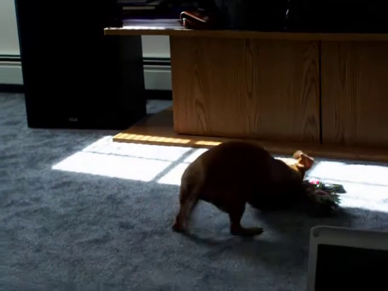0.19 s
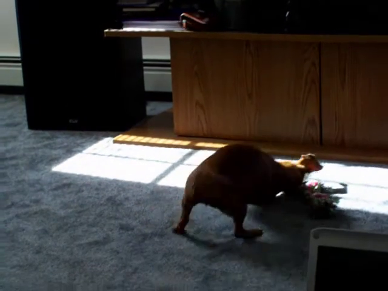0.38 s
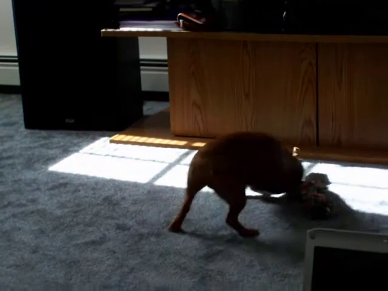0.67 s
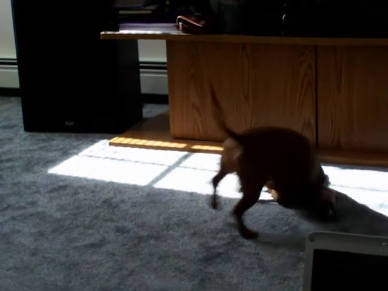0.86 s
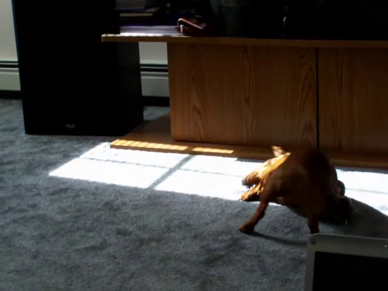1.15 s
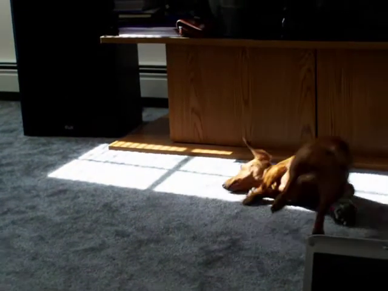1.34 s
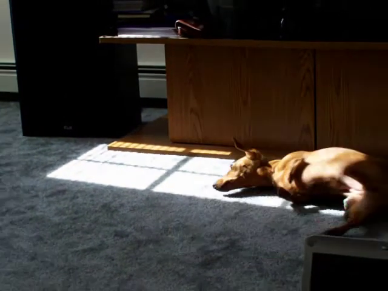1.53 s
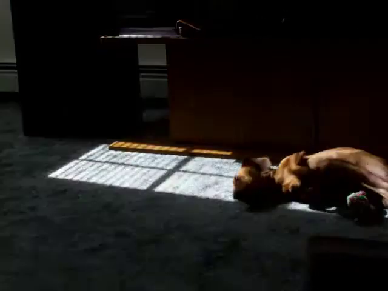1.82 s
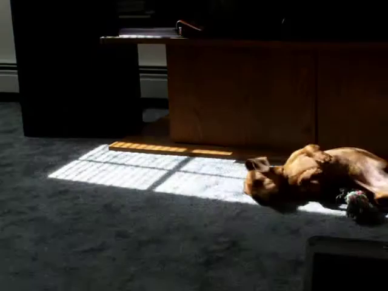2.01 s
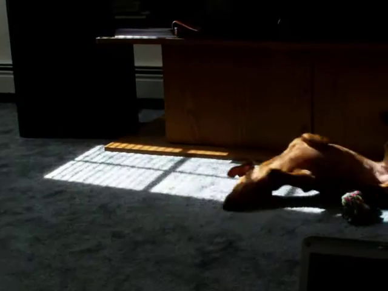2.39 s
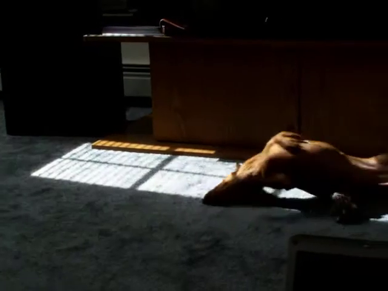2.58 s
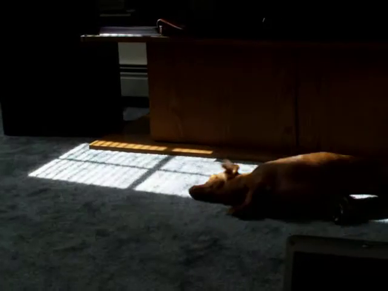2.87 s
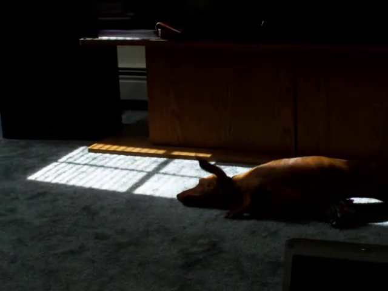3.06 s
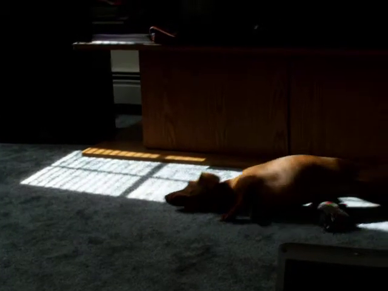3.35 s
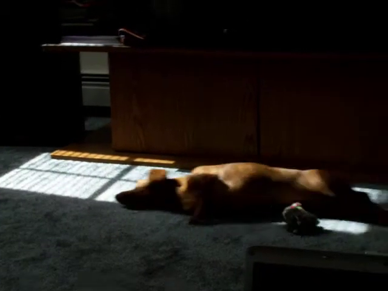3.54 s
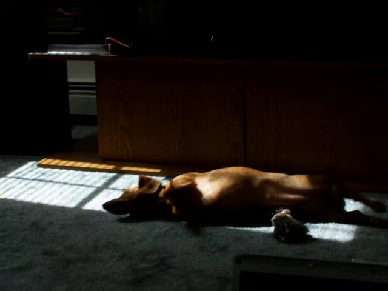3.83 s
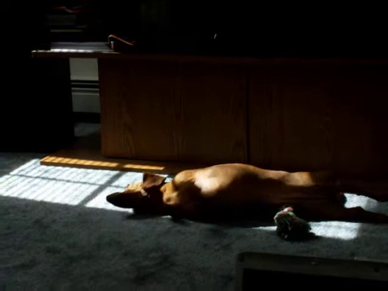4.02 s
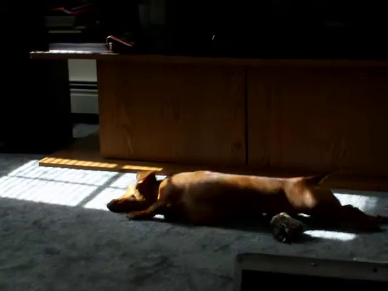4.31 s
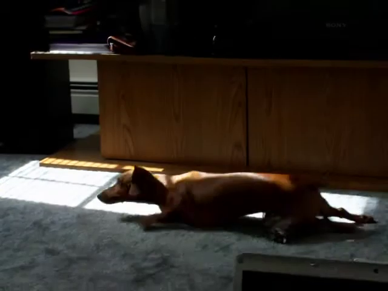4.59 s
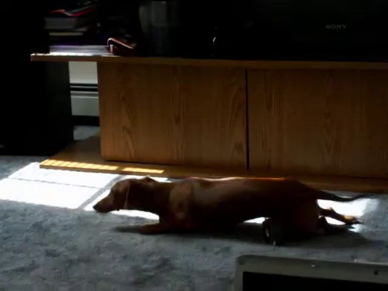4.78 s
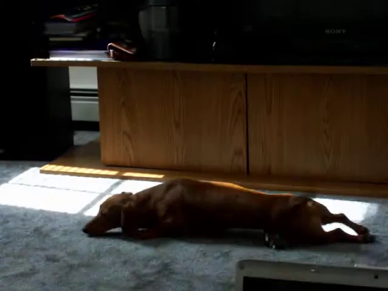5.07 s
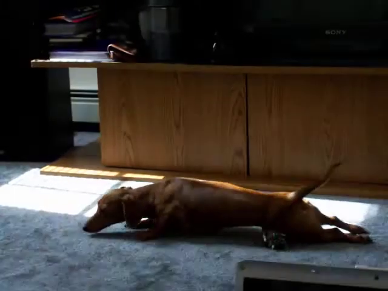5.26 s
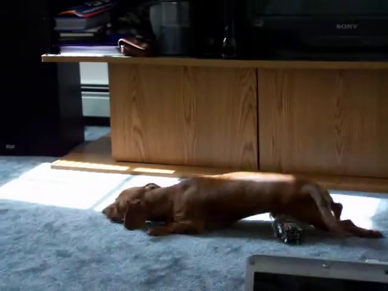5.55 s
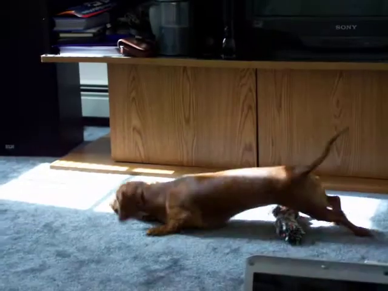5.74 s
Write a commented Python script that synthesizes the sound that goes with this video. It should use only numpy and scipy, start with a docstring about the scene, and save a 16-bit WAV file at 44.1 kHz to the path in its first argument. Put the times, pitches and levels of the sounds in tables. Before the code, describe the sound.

A dog rolls and shuffles on carpet with a rope toy, soft rustles and thumps, broken by sharp mechanical clacks close to the microphone.

```python
"""A small dog rolls and drags itself over a carpet in a quiet living room, heard by a pocket camera.
From the start fur and rope rustle as dense clicks, paws and body thump as decaying floor modes, and hiss
and mains hum lie below; a claw or tag soon ticks. Near 1.9 s a mechanism inside the camera clacks right at
the microphone: knocks and case modes, then a ringing spring. At 3.8 s the rope scrapes along the pile;
more ticks follow, and the mechanism clacks again near 5.1 s and 5.4 s."""
import sys
import numpy as np
from scipy import signal
from scipy.fft import rfft, irfft
from scipy.io import wavfile

SR = 44100
rng = np.random.default_rng(int(sys.argv[2]) if len(sys.argv) > 2 else 0)


def ratio(d):
    """dB to gain"""
    e = np.asarray(d, float) / 20
    return 10 ** e


def int16_out(signal):
    """Quantize to a 16-bit WAV file."""
    q = np.round(np.clip(np.atleast_2d(signal).T, -1, 1) * 32767)
    wavfile.write(sys.argv[1], SR, q.astype(np.int16))


N = 260190


def rms_one(x):
    """Normalisation: equal mean power, so that rms is 1."""
    return x / np.sqrt(np.mean(x ** 2) + 1e-20)


def drift(rate_hz):
    """Low-pass random fluctuation: noise through a double real pole, rms 1."""
    step = 40  # computed at every 40th sample, then interpolated
    r = np.exp(-2 * np.pi * rate_hz * step / SR)
    noise = rng.standard_normal(N // step + 2002)
    slow = signal.lfilter([1], [1, -2 * r, r * r], noise)[2000:]  # the filter has settled
    return np.interp(np.arange(N) / step, np.arange(len(slow)), rms_one(slow))


def colour(x, spectrum):
    """Spectral shaping: each frequency is weighted by a curve of (Hz, dB per Hz); rms 1."""
    hz, db = np.transpose(spectrum)
    log_hz = np.log(np.arange(N // 2 + 1) * SR / N + 1)
    gain = ratio(np.interp(log_hz, np.log(hz), db))
    return rms_one(irfft(rfft(x) * gain, N))


def band_noise(edges_hz):
    """Band-limited noise: a random source through a band-pass, rms 1."""
    band = signal.butter(2, edges_hz, "band", fs=SR, output="sos")
    return rms_one(signal.sosfilt(band, rng.standard_normal(N)))


def ring(clicks, hz, t60):
    """Impulse response of a damped resonator: a unit click starts a sine of height 1."""
    r, w = ratio(-60 / (max(t60, .001) * SR)), 2 * np.pi * hz / SR
    return signal.lfilter([0, np.sin(w)], [1, -2 * r * np.cos(w), r * r], clicks + 1e-18)


def add(out, s, sound):
    """Superposition: a short sound is summed in at its time."""
    i = round(s * SR)
    out[i:i + len(sound)] += sound[:N - i]


def blip(hz, rise_s, t60, size):
    """Soft contact: a finite contact time makes the sine swell before it decays."""
    t = np.arange(size) / SR
    shape = (1 - np.exp(-t / rise_s)) ** 2 * ratio(-60 * t / t60)
    return np.sin(2 * np.pi * hz * t) * shape / shape.max()


def grains(per_s, spread_db):
    """Shot noise: independent clicks of uneven size and random sign; rms 1."""
    sizes = ratio(spread_db * np.minimum(rng.exponential(1, N), 4)) * rng.choice([-1, 1], N)
    return rms_one(sizes * (rng.random(N) < per_s / SR))


def swells(rows, rise, rest_db):
    """Power summation of envelopes, each straight in dB to and from its crest, over a resting level."""
    edge_db = -13  # level at both ends of a swell, relative to its crest
    t, power = np.arange(N) / SR, ratio(rest_db) ** 2
    for s, db, length in rows:
        away = np.maximum((s - t) / (rise * length), (t - s) / ((1 - rise) * length))
        power = power + ratio(db + edge_db * away) ** 2
    return np.sqrt(power)


# spectrum of hiss and room tone: pitch_hz, relative level_db (per Hz)
HISS_SPECTRUM = [(15, -19), (40, -8.5), (65, 0), (95, -9.5), (170, -13.5), (350, -15), (550, -21.5),
                 (1500, -18), (2800, -20.5), (4100, -17), (5200, -24.5), (7500, -31.5), (8800, -38.5)]


def hiss():
    """Stationary random noise: microphone hiss and room tone share one fixed spectrum."""
    return ratio(-50.5) * colour(rng.standard_normal(N), HISS_SPECTRUM)


def hum():
    """Modulated sinusoid: mains hum wavers slowly in level and phase."""
    level = ratio(-53.5 + 0.87 * drift(3))
    phase = 2 * np.pi * 59.2 * np.arange(N) / SR + 0.89 * drift(0.99)
    return level * np.sin(phase)


# shifts of the hand's grip on the case: crest_s, level_db, length_s
GRIP_SHIFTS = [(0.0, -49, .2), (0.28, -47.5, .12), (0.41, -58, 0.089), (1.15, -45.5, 0.11),
               (1.66, -54, 0.24), (2.0, -49, 0.13), (2.97, -45.5, 0.21), (3.24, -63, 0.2), (3.62, -60, .4),
               (4.34, -53, .16), (4.78, -49.5, 0.14), (5.08, -49, .16)]


def grip_rumble():
    """Structure-borne noise: each shift of the grip raises a low rumble in the case."""
    level = swells(GRIP_SHIFTS, rise=0.45, rest_db=-69) * ratio(3 * drift(2.7))
    return level * band_noise([22, 48])


# partials of a coil spring, near multiples of one pitch: pitch_hz, relative level_db, t60_s
SPRING_MODES = [(854, -7.5, 0.19), (1750, -12, 0.5), (2662, -4.5, 0.23)]
# modes of the metal frame: pitch_hz, relative level_db, t60_s
FRAME_MODES = [(735, -11.5, 1), (1710, -13.5, .35), (1910, -5, 0.18), (1980, -9, 0.35), (2310, -11, 0.43),
               (4080, -8, .13), (4700, -18, .2), (6450, -29, 0.52), (7203, -35, 0.27)]
# excitation of both by the clacks:
# start_s, spring_db, spring_lean_db_per_octave, frame_db, frame_lean_db_per_octave (leans pivot at 2000 Hz)
TWANG_PLUCKS = [(1.893, -34, 0, -37, 1), (5.143, -47, 11, -46.5, -0.5), (5.162, -31.5, 1, -39, 7),
                (5.435, -30, 18.5, -49, 7), (5.456, -35, 1, -39.5, 6.5)]


def twangs():
    """Free vibration: spring and frame ring on in their own modes after the contacts."""
    s, spring_db, spring_lean, frame_db, frame_lean = np.transpose(TWANG_PLUCKS)
    out = 0
    for modes, pluck_db, lean in (SPRING_MODES, spring_db, spring_lean), (FRAME_MODES, frame_db, frame_lean):
        for hz, db, t60 in modes:
            plucks = np.zeros(N)
            plucks[np.round(s * SR).astype(int)] = ratio(db + pluck_db + lean * np.log2(hz / 2000))
            out = out + ring(plucks, hz, t60)
    return out


# contacts in the mechanism: start_s, rattle_db (drive of the case), knock_db, knock_pitch_hz
MECHANISM_CONTACTS = [(1.8874, -15, -31, 2720), (1.8894, -21, -17, 4170), (1.891, -26, -20.5, 1370),
                      (1.8922, -19.5, -10.5, 4170), (1.8932, -20, -12, 6000), (1.8905, -33.5, -28.5, 758),
                      (1.8973, -23.5, -25, 1950), (5.1399, -17.5, -29, 4200), (5.141, -8.5, -4.5, 1567),
                      (5.1426, -43, -13, 2620), (5.146, -21, -15, 4200), (5.1500, -17, -13.5, 2070),
                      (5.159, -16.5, -19, 5430), (5.1620, -12, -11, 2160), (5.1652, -17.5, -15, 2570),
                      (5.4269, -17, -18, 6260), (5.4292, -11.5, -13, 4170), (5.4332, -12.5, -11, 2030),
                      (5.437, -14, -22, 3960), (5.4413, -11, -18, 3460), (5.4467, -15, -25.5, 1900),
                      (5.455, -14, -7.5, 1560), (5.4556, -17.5, -3.5, 2030), (5.4590, -18.5, -22, 4200)]
# resonances of the camera's plastic case: pitch_hz, width_hz, relative level_db
CASE_MODES = [(260, 56, -15.5), (743, 80, -7), (900, 48, 0.5), (1560, 396, 2.5), (2100, 310, 6.5),
              (2812, 152, 9.5), (4170, 364, 4), (4730, 150, 2), (5900, 1480, -3), (7210, 800, -10.5)]


def clacks():
    """Impact and forced resonance: each contact knocks once and rattles loose parts against the case."""
    rattle_t60_s = 0.024
    dull_hz, bright_hz = 900, 6000  # knocks this low drive only low case modes, this high only high ones
    loose, t = grains(6000, spread_db=4.5), np.arange(3000) / SR
    low_drive, high_drive, knocks = np.zeros((3, N))
    for s, rattle_db, knock_db, hz in MECHANISM_CONTACTS:
        dying = ratio(rattle_db - 60 * t / rattle_t60_s)
        bright = np.clip(np.log(hz / dull_hz) / np.log(bright_hz / dull_hz), 0, 1)
        add(low_drive, s, dying * np.sqrt(1 - bright))
        add(high_drive, s, dying * np.sqrt(bright))
        add(knocks, s, ratio(knock_db) * blip(hz, 0.00017, 22.7 / hz, size=1500))
    out = knocks
    for k, (hz, width, db) in enumerate(CASE_MODES):
        rattle = loose * (high_drive if hz > 3300 else low_drive)
        r = np.exp(-np.pi * width / SR)
        poles = [1, -2 * r * np.cos(2 * np.pi * hz / SR), r * r]
        mode = (1 - r * r) / 2 * signal.lfilter([1, 0, -1], poles, rattle + 1e-18)
        out = out + (-1) ** k * ratio(db + 7.5) * mode  # neighbouring modes alternate in sign
    return out


# contacts of a claw or tag: start_s, level_db, pitch_hz
CLAW_TICKS = [(0.4008, -15.5, 3800), (4.286, -32, 3800), (4.5288, -30.5, 4000), (5.3474, -46, 4300)]


def ticks():
    """Hard impact and reflection: a bright crack, a short ring and a faint echo off the floor."""
    out = np.zeros(N)
    for s, db, hz in CLAW_TICKS:
        body = blip(hz, 0.0011, 0.0028, size=600)
        crack = ratio(-14.5) * blip(1.34 * hz, .0001, 0.003, size=600)
        tick = ratio(db) * (body + crack)
        add(out, s, tick)
        add(out, s + 0.0019, ratio(-15) * tick)
    return out


# landings of paws and body: start_s, level_db, centre_hz, spread_octaves, slap_db
LANDINGS = [(0.225, -47, 140, 2.1, -44.5), (0.266, -48, 110, 1.4, -51), (0.704, -43, 696, 1.2, -41),
            (2.661, -45.5, 330, 1.2, -49), (2.678, -49, 400, 1.5, -50), (3.528, -52, 350, 1.7, -48),
            (3.557, -38.5, 800, 2.5, -35.5), (3.712, -48, 606, 1, -54), (3.797, -34, 410, 0.81, -55),
            (3.811, -40, 377, 0.81, -52), (4.2857, -39.5, 1700, 1.4, -39), (4.349, -50, 350, 1.1, -48),
            (4.522, -37.5, 346, 1.2, -41), (4.659, -61, 900, 1.3, -52)]
# modes of the floor: pitch_hz, relative level_db, t60_s
FLOOR_MODES = [(110, 4.5, 0.054), (206, 5, 0.044), (327, -9, 0.11), (384, -1.5, 0.048), (516, -8, 0.071),
               (782, -2, 0.031), (1100, -7, .03), (1385, -1, 0.026), (1900, 0, 0.018)]


def thumps():
    """Modal excitation: a landing rings the floor modes near its centre; skin slaps on the pile."""
    slap_t60_s = 0.03
    slap_dull_hz, slap_span_octaves = 900, 3.1  # landings that reach above this pitch slap brighter
    out, t = np.zeros(N), np.arange(6000) / SR
    low_slap, high_slap = np.zeros((2, N))
    uneven_db = rng.normal(0, 3.1, (len(LANDINGS), len(FLOOR_MODES)))
    for (s, db, centre_hz, octaves, slap_db), chances in zip(LANDINGS, uneven_db):
        for (hz, mode_db, mode_t60), chance_db in zip(FLOOR_MODES, chances):
            near = np.exp(-(np.log2(hz / centre_hz) / octaves) ** 2)
            add(out, s, near * ratio(db + mode_db + chance_db) * blip(hz, 0.0019, mode_t60, size=6000))
        bright = np.clip((np.log2(centre_hz / slap_dull_hz) + octaves) / slap_span_octaves, 0, 1)
        slap = ratio(slap_db - 60 * t / slap_t60_s)
        add(low_slap, s, slap * np.sqrt(1 - bright / 2))
        add(high_slap, s, slap * np.sqrt(bright / 2))
    return out + low_slap * band_noise([250, 740]) + high_slap * band_noise([850, 3000])


# spectrum of fibres on the pile, also heard in the rustle: pitch_hz, relative level_db (per Hz)
FIBRE_SPECTRUM = [(700, -8.5), (1200, -8.5), (2000, -9), (3000, -3), (4200, 1), (5200, -10.5), (7000, -20),
                  (8500, -27)]


def scrape():
    """Friction noise: the rope catches, swells and slides free; coarse grains excite two bands of it."""
    start_s, swell_s, t60_s = 3.795, .024, .19
    catch_db, crest_db = -43, -38.5
    t = np.arange(N) / SR - start_s
    swell_db = np.interp(t, [0, swell_s], [catch_db, crest_db])
    level = (t > 0) * ratio(swell_db - 60 * np.maximum(t - swell_s, 0) / t60_s)
    rough = grains(2000, spread_db=0.5)
    bands = rms_one(ring(rough, 3580, 0.0037) + ratio(-2.5) * ring(rough, 4930, 0.0037))
    return level * (bands + ratio(-4) * colour(rough, FIBRE_SPECTRUM))


# spectrum of the body's shuffle: pitch_hz, relative level_db (per Hz)
SHUFFLE_SPECTRUM = [(60, -6), (120, -4.5), (300, -1.5), (500, -7), (1000, -8), (1800, -29)]
# the body's weight shifting on the floor: time_s, level_db
WEIGHT_SHIFTS = [(0.0, -57), (0.5, -54.5), (2.2, -58.5), (2.8, -56), (4.3, -59.5), (4.5, -56.5),
                 (5.05, -55.5), (5.9, -59.5)]


def shuffle():
    """Low-frequency friction noise: its level follows the weight on the floor, with a random waver."""
    s, db = np.transpose(WEIGHT_SHIFTS)
    weight_db = np.interp(np.arange(N) / SR, s, db)
    return colour(rng.standard_normal(N), SHUFFLE_SPECTRUM) * ratio(weight_db + 1.8 * drift(10))


# strokes of fur and rope over the pile: crest_s, level_db, length_s
FUR_STROKES = [(0.03, -53.5, 0.36), (0.28, -48, 0.15), (0.43, -44.5, 0.13), (0.63, -55, 0.35),
               (0.931, -49.5, 0.29), (1.141, -48.5, 0.26), (1.471, -46, 0.23), (1.85, -51, 0.48),
               (2.58, -52, 0.7), (2.93, -52, 0.83), (3.12, -54, .14), (3.384, -52, 0.47), (3.486, -51, .07),
               (3.57, -46, 0.25), (3.71, -52, 0.42), (3.88, -61, 0.13), (4.08, -44.5, 0.1),
               (4.31, -46.5, 0.29), (4.65, -49.5, 0.49), (4.86, -51.5, 0.66), (5.075, -45, 0.38),
               (5.42, -51.5, 0.9), (5.735, -51, 0.44)]


def rustle():
    """Shot noise of friction: fibres snap over the pile in dense grains, stroke by stroke."""
    level = swells(FUR_STROKES, rise=0.36, rest_db=-68) * ratio(0.95 * drift(11))
    return level * colour(grains(8000, spread_db=1.5), FIBRE_SPECTRUM)


def room(x):
    """Reverberation by convolution: carpet and furniture leave a short dull tail."""
    t = np.arange(9000) / SR
    dull = signal.lfilter([.5], [1, -.5], rng.standard_normal(len(t)))
    tail = dull * ratio(-60 * t / 0.29) * (t > .004)
    return signal.fftconvolve(x, tail / np.sqrt(np.sum(tail ** 2)))[:N]


def scene():
    """Superposition of sources: the dog in the room, the mechanism at the microphone."""
    dog = thumps() + scrape()
    near = clacks() + ticks()
    reflected = ratio(-18.5) * room(dog) + ratio(-30.0) * room(near)
    background = hiss() + hum() + grip_rumble()
    mix = dog + near + reflected + twangs() + rustle() + shuffle() + background
    return mix[None]


def roll_off(x):
    """The treble ends steeply here."""
    return signal.sosfilt(signal.butter(12, 9300, fs=SR, output="sos"), x)


def record(dry):
    """Saturation and band limiting: peaks are rounded, then the top is cut steeply."""
    rounded = 1.15 * np.tanh(dry / 1.223)
    low_pass = signal.cheby2(12, 70, 9695, fs=SR, output="sos")  # 70 dB down from 9695 Hz
    mix = signal.sosfilt(low_pass, rounded)
    return roll_off(mix)


dry = scene()
out = record(dry)
int16_out(out)
```